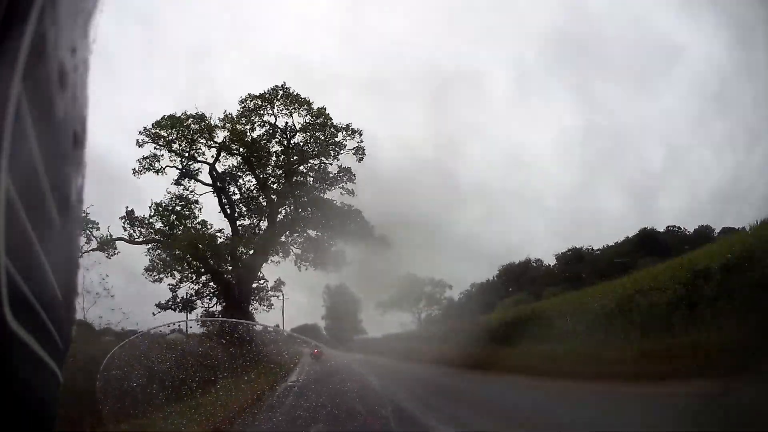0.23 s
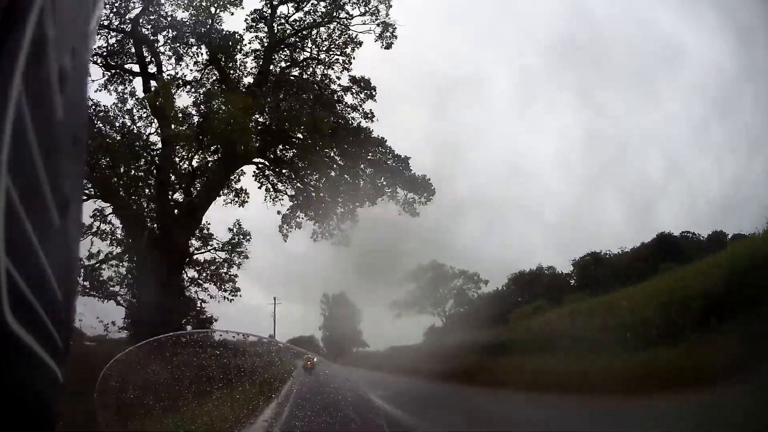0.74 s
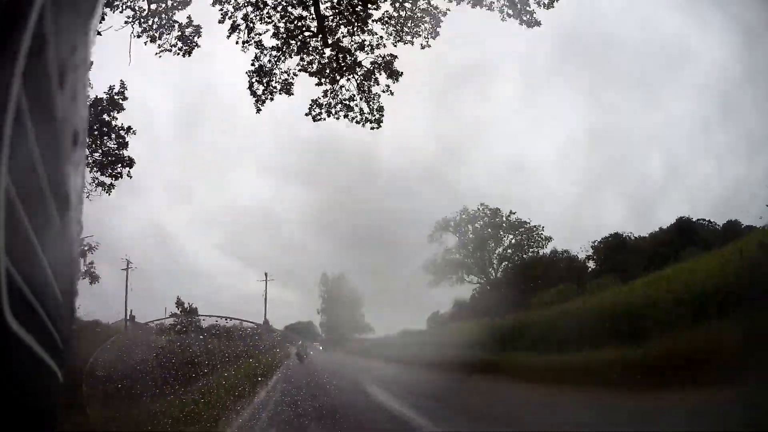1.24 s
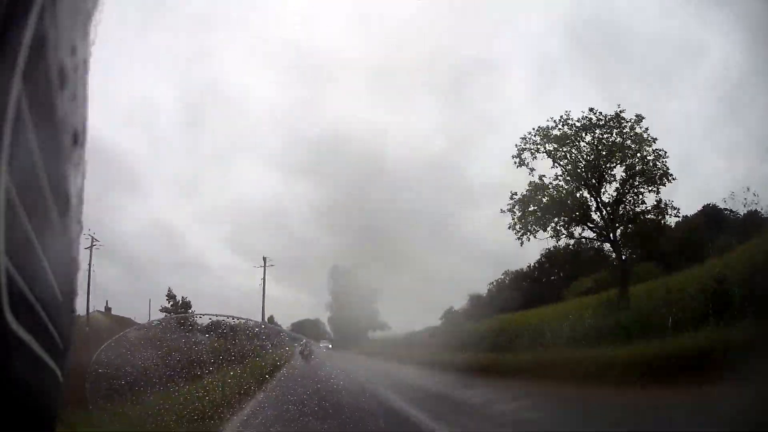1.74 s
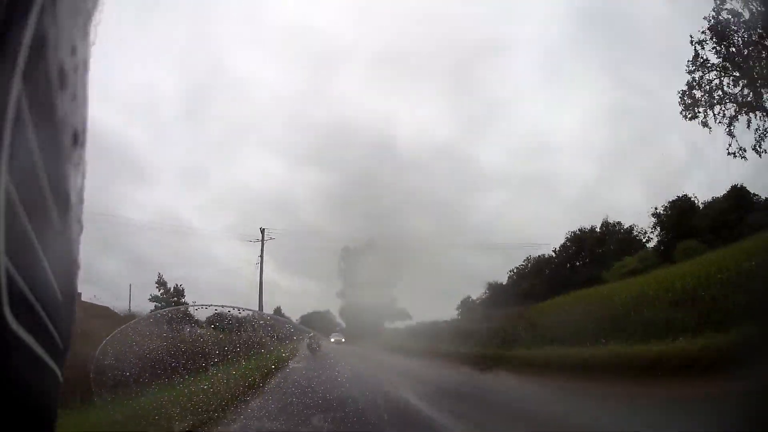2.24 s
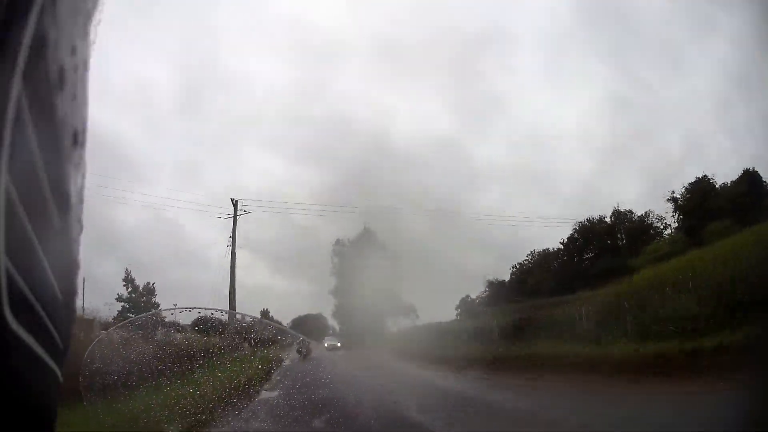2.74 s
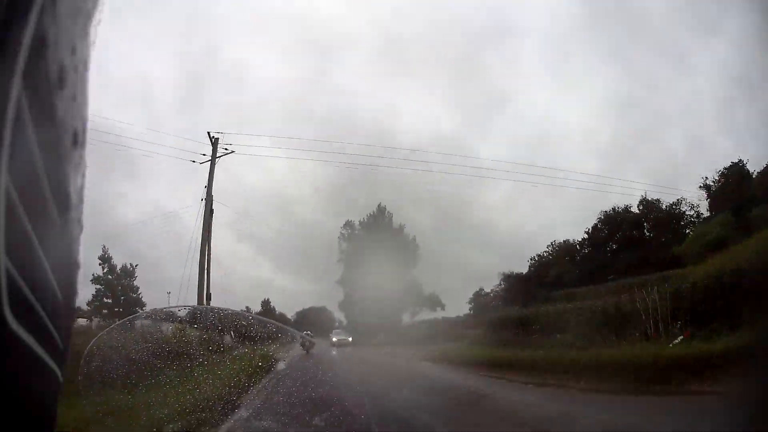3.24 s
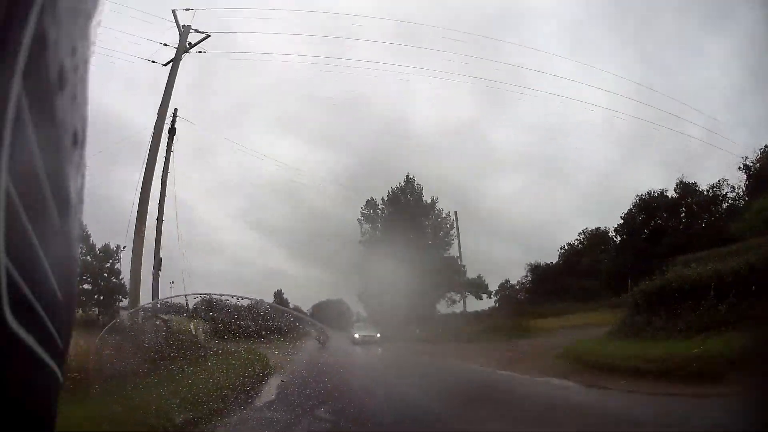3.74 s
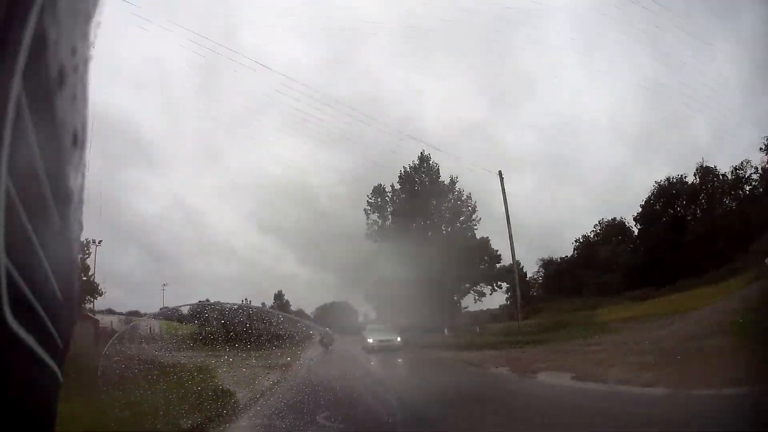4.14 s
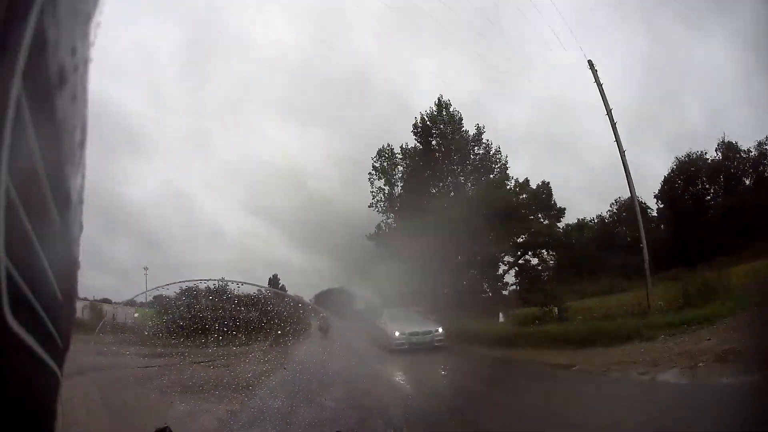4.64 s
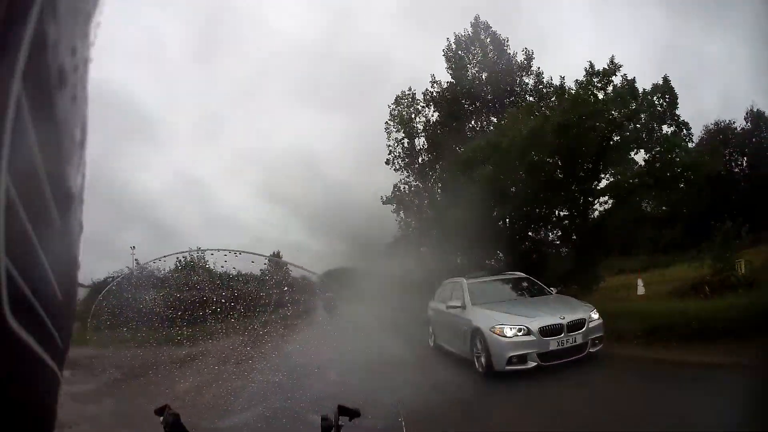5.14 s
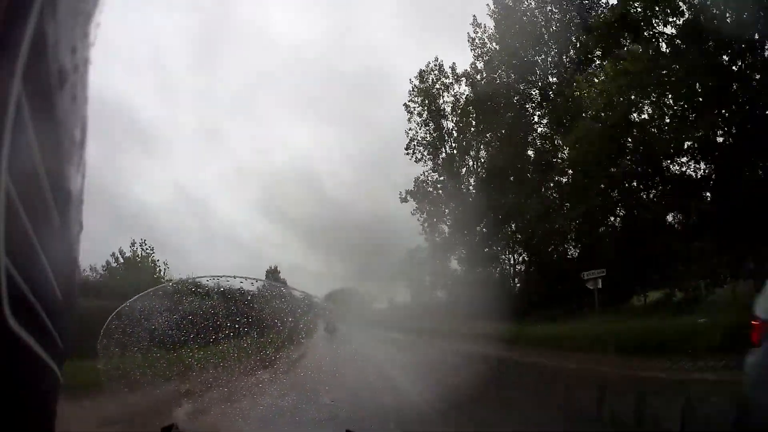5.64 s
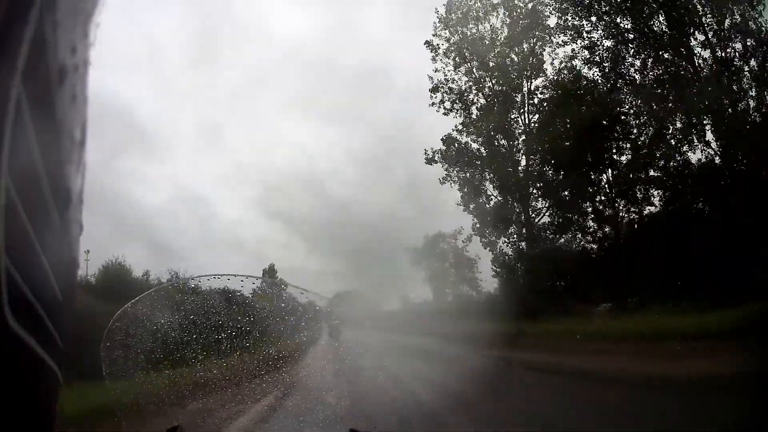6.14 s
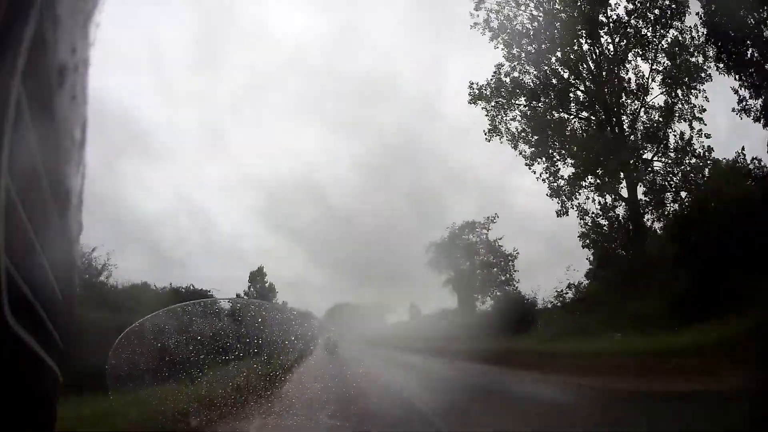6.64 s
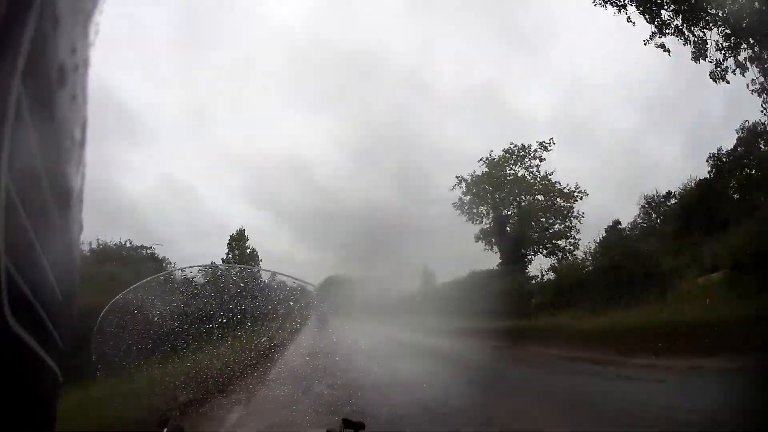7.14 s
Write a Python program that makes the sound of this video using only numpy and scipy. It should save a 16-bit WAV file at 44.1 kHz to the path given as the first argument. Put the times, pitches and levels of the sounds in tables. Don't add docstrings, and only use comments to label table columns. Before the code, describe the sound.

Close, boxy and overloaded sound from inside a case on a motorcycle riding through rain. Deep wind buffeting dominates, with hollow roar, rushing air and steady wet hiss. Gust fronts slap the housing, hardest around two and a half seconds and again near four. Crisp drops click and splat at random. The low engine note sags, then picks up in the last two seconds before a sudden stop.

```python
import sys
import numpy as np
from scipy import signal
from scipy.io import wavfile
from scipy.ndimage import uniform_filter1d

SR = 44100
rng = np.random.default_rng(int(sys.argv[2]) if len(sys.argv) > 2 else 0)


def put_to_file(sound):
    columns = np.atleast_2d(sound).T
    safe = np.clip(columns, -1, 1)
    whole_steps = np.round(safe * 32767)
    wavfile.write(sys.argv[1], SR, whole_steps.astype(np.int16))


def makeup_ratio(level_db):
    decades = np.asarray(level_db, float) / 20
    return 10 ** decades


N = 326119

# (time [s], level [dB])
WET = [(0, -52), (.5, -58), (1.25, -59), (1.6, -55.5), (2.4, -51.5), (2.75, -55.5), (3.7, -52), (4.45, -52),
       (5.0, -55), (6.2, -52), (6.5, -54.5), (7.2, -52.5)]


def rms_one(x):
    return x / np.sqrt(np.mean(x ** 2) + 1e-20)


def in_time(rows):
    s, *columns = np.transpose(rows)
    return [np.interp(np.arange(N) / SR, s, c) for c in columns]


def drift(rate_hz):
    r = np.exp(-40 * np.pi * rate_hz / SR)
    white = rng.standard_normal(N // 20 + 2002)
    slow = signal.lfilter([1], [1, -2 * r, r * r], white)[2000:]
    return np.interp(np.arange(N) / 20, np.arange(len(slow)), rms_one(slow))


def resonance(x, hz, width_hz):
    r = np.exp(-np.pi * width_hz / SR)
    zeros = np.array([1, 0, -1]) * (1 - r * r) / 2
    poles = [1, -2 * r * np.cos(2 * np.pi * hz / SR), r * r]
    return signal.lfilter(zeros, poles, x + 1e-18)


def low_pass(x, hz):
    return signal.sosfiltfilt(signal.butter(8, hz, fs=SR, output="sos"), x)


def turbulence(spectrum, eddies, rate_hz, shared_db, own_db):
    hz, level_db = np.transpose(spectrum)
    thirds_hz = 975 * 2 ** (np.arange(-19, 13) / 3)
    edges_hz = thirds_hz[(thirds_hz > hz[0]) & (thirds_hz < hz[-1])]
    out, white = 0, rng.standard_normal((2, N + 8000))
    for k, (low, high) in enumerate(zip(edges_hz, edges_hz[1:])):
        sos = signal.butter(3, [low, high], "band", fs=SR, output="sos")
        band = signal.sosfilt(sos, white[k % 2])[-N:]
        colour_db = np.interp(np.log(low * high) / 2, np.log(hz), level_db)
        out = out + band * makeup_ratio(colour_db + shared_db * eddies + own_db * drift(rate_hz))
    return rms_one(out)


def surges():
    # (time of peak [s], level over the stream [dB], build-up [s])
    surge_rows = [(.44, 1, 0.14), (.82, 4.5, 0.2), (1.53, 3, .05), (1.72, 3, .15), (2.14, 4, 0.32),
                  (2.53, 9, .1), (3.3, 4, 0.078), (3.8, 4.5, 0.07), (4.2, 0, 0.08), (4.93, 4, 0.078),
                  (5.24, 4, 0.19), (5.77, 0, 0.13), (6.27, 7.5, 0.45), (6.82, 7, 0.29), (7.19, 6, 0.076)]
    drop_s = 0.042
    t = np.arange(N) / SR
    return sum(np.interp(t, [s - rise_s, s, s + drop_s], [0, over_db, 0])
               for s, over_db, rise_s in surge_rows)


def airstream():
    # (time [s], level [dB])
    wind_rows = [(0, -21), (.4, -22.5), (.66, -26), (1.0, -24), (1.5, -23.5), (1.85, -24.5), (2.3, -20.5),
                 (2.7, -22.5), (3.6, -20.5), (4.3, -18.5), (4.7, -22.5), (5.0, -25.5), (5.4, -22),
                 (5.85, -24.5), (6.5, -25), (7.0, -24), (7.2, -22)]
    # (frequency [Hz], density [dB per Hz])
    buffet_spectrum = [(12, -2.5), (25, 0), (60, -3), (120, -3.5), (180, -6), (260, -21), (400, -35.5)]
    # (frequency [Hz], density [dB per Hz])
    roar_spectrum = [(110, -32), (200, -3), (300, -2), (400, -5.5), (560, -5.5), (720, -12.5), (950, -20.5),
                     (1300, -60.5)]
    # (frequency [Hz], density [dB per Hz])
    rush_spectrum = [(600, -6.5), (870, -0.5), (1100, -4), (1740, -5.5), (2190, -15.5), (3700, -17),
                     (4380, -26.5), (5500, -45)]
    # (frequency [Hz], density [dB per Hz])
    spray_spectrum = [(3200, -7), (4500, -4.5), (6500, -5.5), (8000, -1.5), (11000, -8.5), (12800, -11.5),
                      (15000, -13), (16500, -45)]

    wind_db, = in_time(wind_rows)
    spray_db, = in_time(WET)
    surge_db = surges()
    swing_db = wind_db - wind_db.mean()
    wet_swing_db = spray_db - spray_db.mean()
    eddies, swells = drift(37), drift(21)

    shelter_db, = in_time([(5.45, 0), (5.75, -0.7)])
    buffet_db = -18.5 + shelter_db + 1.03 * swing_db + 0.94 * surge_db
    buffet_eddies = eddies + 0.34 * swells
    buffet = makeup_ratio(buffet_db) * turbulence(buffet_spectrum, buffet_eddies, 7.4, shared_db=1.38, own_db=0.67)

    roar_eddies = 0.69 * eddies + 0.29 * swells
    roar = turbulence(roar_spectrum, roar_eddies, 25, shared_db=2.0, own_db=0.8)
    hollow = rms_one(roar + 0.59 * resonance(roar, 554, 110))
    roar = makeup_ratio(wind_db + surge_db - 0.26) * hollow

    rush_db = -37 + 0.66 * swing_db + 0.14 * wet_swing_db + 0.81 * surge_db
    rush = makeup_ratio(rush_db) * turbulence(rush_spectrum, eddies, 45, shared_db=1.5, own_db=2.0)

    mist_eddies = 0.4 * eddies + 0.9 * drift(160)
    mist = turbulence(spray_spectrum, mist_eddies, 60, shared_db=2.0, own_db=1.0)
    mist = makeup_ratio(spray_db - 1 + 0.45 * surge_db) * mist
    return buffet + roar + rush + mist


def engine():
    # (time [s], rate [cycles per s])
    speed_rows = [(0, 20.0), (1, 19.5), (3.7, 17.0), (4.5, 16.8), (4.8, 16.33), (5.4, 16.46), (5.7, 16.7),
                  (6.3, 17.51), (7.2, 18.3)]
    # (multiple of the cycle, level light [dB], level pulling [dB])
    orders = [(2, -30, -33), (3, -36, -36), (5, -21, -22), (6, -27, -20), (7, -34, -33), (8, -20, -20),
              (9, -33, -30), (10, -38, -31), (11, -36, -27), (12, -40, -32), (13, -32, -30), (14, -37, -32),
              (16, -40, -36)]
    second_firing = 0.375
    throttle_opens_s, throttle_full_s = 5.25, 6.0

    cycles_hz, = in_time(speed_rows)
    pull, = in_time([(throttle_opens_s, 0), (throttle_full_s, 1)])
    exhaust_db, = in_time([(1.2, -12), (5.1, 0), (throttle_full_s + 0.25, 1.8), (6.6, -1.5)])
    turn = 2 * np.pi * np.cumsum(cycles_hz) / SR
    waver_db = 1.2 * drift(5)
    note = 0
    for k, light_db, pulling_db in orders:
        sign = np.sign(np.cos(np.pi * k * second_firing))
        level_db = light_db + pull * (pulling_db - light_db)
        note = note + sign * makeup_ratio(level_db) * np.cos(k * turn - 0.0622 * k * k)
    return np.sqrt(2) * makeup_ratio(exhaust_db + waver_db - 2.5) * note


def drops():
    # (time [s], level [dB], length [ms], low mode [dB])
    splats = [(.2015, -32, 3.4, 6), (.6428, -28.5, 3.3, -1), (1.4996, -30, 5.2, 3), (1.5101, -27, 3.1, 7.5),
              (1.587, -29.5, 4, 5), (5.159, -31.5, 4.2, -3), (1.862, -28.5, 5.6, -5),
              (1.9992, -33, 7.6, -1), (2.0449, -31, 2.7, -0.5), (2.3852, -27, 5.7, 1),
              (2.5933, -28.5, 2.5, -12), (3.006, -27.5, 6.4, 1.5), (7.137, -33.5, 6.4, 1.5),
              (3.358, -31.5, 2.5, -13), (3.5517, -21.5, 4.2, -6), (3.586, -19, 4.7, 3),
              (3.7352, -29, 4.6, -5), (3.775, -20, 4.9, 3.5), (3.8347, -28.5, 3.1, 6.5),
              (3.889, -24, 3.26, .6), (4.1918, -27, 2.7, 1.5), (4.2496, -29, 4.1, 0.5),
              (4.362, -30, 4.2, -9.5), (4.379, -29, 5, 3), (4.4283, -23, 4.7, -1), (4.9172, -29.5, 3.5, 6),
              (4.9417, -30.5, 12, -17.5), (5.5236, -31.5, 4.1, .6), (5.758, -30.5, 2.9, 8),
              (6.311, -30.5, 4.7, 2)]
    # (time [s], level [dB], low mode [dB])
    tap_rows = [(.2254, -28.5, 7), (.2754, -31.5, -4), (.4343, -34.5, 5), (0.559, -27, -5),
                (0.5729, -33, 7), (0.8122, -35, 0), (1.8107, -29, 0), (1.115, -39.5, -4), (1.5246, -27, 4),
                (2.1363, -25, -1), (2.1654, -27, 5), (2.4427, -32, 10), (2.4787, -15.5, -2),
                (2.568, -26, 2.5), (3.1769, -29.5, 3), (3.412, -29.5, 6.5), (3.4767, -31, 6),
                (3.657, -27.5, 0), (3.9377, -29.5, 5), (3.974, -29, 8.5), (4.7851, -31.5, 12.5),
                (4.898, -29.5, 9), (5.2934, -32.5, 5), (5.635, -32, 2), (5.767, -27, 2), (5.9537, -30, -3),
                (6.41, -29.5, 1), (6.8408, -30.5, 11.5), (7.0555, -30, .6), (7.1863, -30.5, 3)]
    # (time [s], level [dB])
    thud_rows = [(.183, -34.5), (.4085, -36.5), (.4458, -37), (.6589, -36), (.753, -39), (1.2192, -35.5),
                 (1.238, -32), (1.28, -34), (1.5478, -32), (1.7135, -30.5), (2.5462, -35), (2.5137, -31.5),
                 (3.1186, -36), (3.2833, -34.5), (3.517, -35), (3.6704, -34), (3.757, -31), (4.218, -34),
                 (4.3168, -32), (4.4838, -32), (4.7755, -34), (5.3893, -34), (5.7995, -35), (6.087, -34),
                 (6.287, -32), (6.3205, -33.5), (6.438, -32), (6.6297, -36.5), (6.7932, -33), (7.1768, -32)]
    tap_ms, thud_ms, thud_low_db = 1.69, 2.13, 8.5
    count, patter_db, spread_db, patter_ms = 62, -35.5, 1.5, 3
    patter_low_db, low_db_per_doubling = -0.5, -2.5

    when, size, spread, tone = rng.standard_normal((count, 4)).T
    wetness = np.cumsum(makeup_ratio(1.3 * in_time(WET)[0] + 0.8 * surges()))
    slot = np.clip((np.arange(count) + 0.5 + 0.8 * when) / count, 0, 0.97)
    doublings = 0.6 * np.clip(spread, -2, 2)
    patter = zip(np.interp(slot, wetness / wetness[-1], np.arange(N) / SR),
                 patter_db + spread_db * np.clip(size, -2, 1.3),
                 patter_ms * 2 ** doublings,
                 patter_low_db + low_db_per_doubling * doublings + 4.0 * tone)
    taps = [(s, level_db, tap_ms, low_db) for s, level_db, low_db in tap_rows]
    thuds = [(s, level_db, thud_ms, thud_low_db) for s, level_db in thud_rows]
    return [*splats, *taps, *thuds, *patter]


def rain():
    # (frequency [Hz], width [Hz], level [dB])
    case_modes = [(5000, 880, 3), (6760, 1100, 13.5), (7850, 470, 18), (9350, 1170, 17.5),
                  (11050, 1100, 15.5), (13600, 2600, -2)]

    def modes(x):
        return sum(makeup_ratio(level_db) * resonance(x, hz, width_hz) * (-1) ** k
                   for k, (hz, width_hz, level_db) in enumerate(case_modes))

    def body(x):
        return resonance(resonance(x, 3000, 3100), 3000, 4300) + 0.056 * resonance(x, 1700, 800)

    length = N + 2000
    splat, snap, thud = np.zeros((3, length))
    grit = rng.standard_normal(length) * makeup_ratio(2.8 * rng.standard_normal(length))
    for s, level_db, ms, low_db in drops():
        at, age = round(s * SR), np.arange(1500) / SR / (ms / 1000)
        shape = makeup_ratio(level_db - 5.5) * np.clip(age / 0.43, 0, 1) * np.exp(-(0.99 * age) ** 4)
        splat[at:at + 1500] += shape * min(ms / 1.8, 1)
        snap[at:at + 1500] += shape * 1.95 / (1 + ms)
        thud[at:at + 1500] += shape * makeup_ratio(low_db)

    tick_db = -48 + 2.6 * np.minimum(rng.exponential(1, length), 3)
    born = (rng.random(length) < 70 / SR) * makeup_ratio(tick_db)
    small = np.convolve(born, np.hanning(36), "same")

    crack = signal.butter(3, [4300, 15400], "band", fs=SR, output="sos")
    ringing = modes(grit * (splat + 1.46 * small)) / np.std(modes(grit))
    impact = signal.sosfilt(crack, grit * (snap + 0.74 * small))
    dull = body(grit * (thud + 1.2 * small)) / np.std(body(grit))
    return (ringing + impact + makeup_ratio(-1.4) * dull)[:N]


def slaps():
    # (time [s], peak level [dB], frequency [Hz])
    slap_rows = [(0.425, 0, 190), (0.433, 3, 320), (0.699, -6.5, 288), (0.793, -0.5, 236), (1.648, -4, 218),
                 (1.76, -5, 510), (2.197, -2, 303), (2.369, -13, 563), (2.419, -4.5, 574),
                 (2.513, 3.5, 603), (2.546, 6.5, 283), (2.584, -3.5, 250), (3.045, -8.5, 563),
                 (3.257, -7, 538), (3.515, 0.5, 260), (3.769, -13, 245), (4.037, 1.5, 284),
                 (4.095, -7, 285), (4.182, 5, 232), (4.26, -4, 263), (4.376, 0, 195), (4.742, -21, 560),
                 (5.061, -24, 522), (5.164, -6, 560), (5.192, -3, 202), (5.262, -12, 950), (6.754, -8, 557),
                 (6.949, -9, 216), (7.046, -1, 255)]
    push, age_s = np.zeros(N + 900), np.arange(900) / SR
    for s, peak_db, hz in slap_rows:
        at = round(s * SR)
        cycle = np.sin(2 * np.pi * hz * age_s) * np.exp(-(age_s * hz) ** 2)
        push[at:at + 900] -= makeup_ratio(peak_db - 5.5) * cycle
    cavity = makeup_ratio(-8.5) * resonance(push, 520, 110)
    shell = makeup_ratio(-5.0) * resonance(push, 1100, 700)
    return (push + cavity + shell)[:N]


def scene():
    return (airstream() + slaps() + engine() + rain())[None]


def ragged_top(x):
    below, frames = low_pass(x, 13600), N // 512 + 1
    out = below
    for hz, need_db in ((14300, -78), (15000, -78), (15800, -67)):
        upto = low_pass(x, hz)
        band = np.resize(upto - below, frames * 512).reshape(frames, 512)
        threshold = makeup_ratio(need_db + 3.0 * rng.standard_normal(frames))
        kept = np.repeat(band.std(axis=1) > threshold, 512)[:N]
        out = out + uniform_filter1d(kept * 1., size=128) * (upto - below)
        below = upto
    return out


def starve(x):
    # (time [s], length [ms], frequency [Hz], level [dB])
    dropouts = [(.071, 37, 8130, -53), (.142, 11, 8268, -49), (.304, 14, 8085, -55), (.695, 16, 14300, -70),
                (.997, 16, 3650, -45.5), (1.237, 14, 6500, -64), (1.412, 11, 7900, -62),
                (2.972, 11.5, 8580, -55), (3.342, 12.5, 9345, -61), (4.137, 15, 6341, -62),
                (4.851, 15, 8200, -70), (4.948, 38, 6535, -58), (5.226, 23, 8200, -66),
                (5.457, 16, 8257, -58), (5.852, 9.2, 7800, -59), (6.573, 4.1, 7800, -62),
                (6.969, 9.4, 5630, -61)]
    weaker_hz, weaker_db = np.array([4500, 9600, 10900]), -3
    t, gap, lines = np.arange(N) / SR, np.zeros(N), np.zeros(N)
    for s, ms, main_hz, main_db in dropouts:
        inside_s = np.minimum(t - s, s + ms / 1000 - t)
        gap = np.maximum(gap, np.clip(inside_s / 0.008 + 0.45, 0, 1))
        window = np.sin(np.pi * np.clip((t - s + 0.0064) / (ms / 1000 + 0.023), 0, 1))
        chance, detune = rng.random((2, len(weaker_hz)))
        others_hz = (weaker_hz * (0.96 + 0.08 * detune))[chance < 0.45]
        tones = np.sin(2 * np.pi * main_hz * t)
        for hz in others_hz:
            tones = tones + makeup_ratio(min(weaker_db, -58 - main_db)) * np.sin(2 * np.pi * hz * t)
        lines += makeup_ratio(main_db) * window * tones
    return x + gap * (low_pass(x, 3800) - x) + lines


def top_cut(x):
    return signal.sosfilt(signal.butter(12, 16510, fs=SR, output="sos"), x)


def record(dry):
    ceiling, cut_s = 0.705, 7.1955
    loud = np.clip(dry, -ceiling, ceiling)
    t = np.arange(N) / SR
    edit = np.clip((cut_s - t) / 0.0004, 0, 1) * np.clip(t / 0.002, 0, 1)
    mix = starve(ragged_top(loud)) * edit
    return top_cut(mix)


dry = scene()
out = record(dry)
put_to_file(out)
```